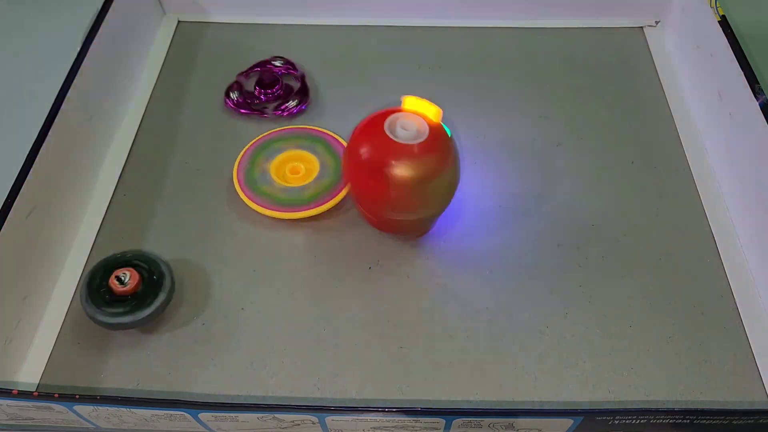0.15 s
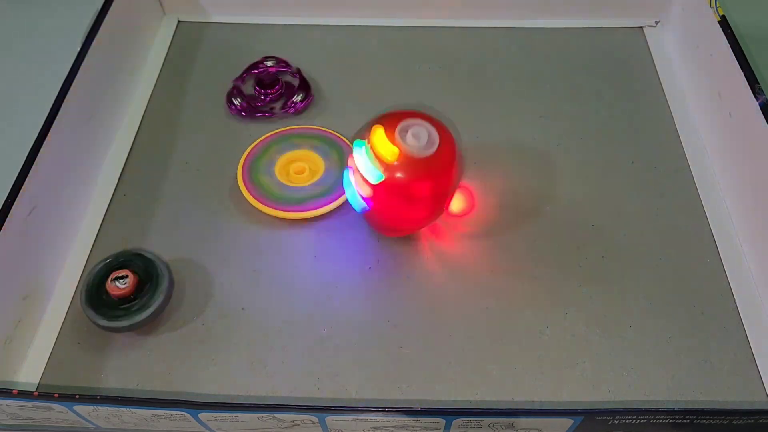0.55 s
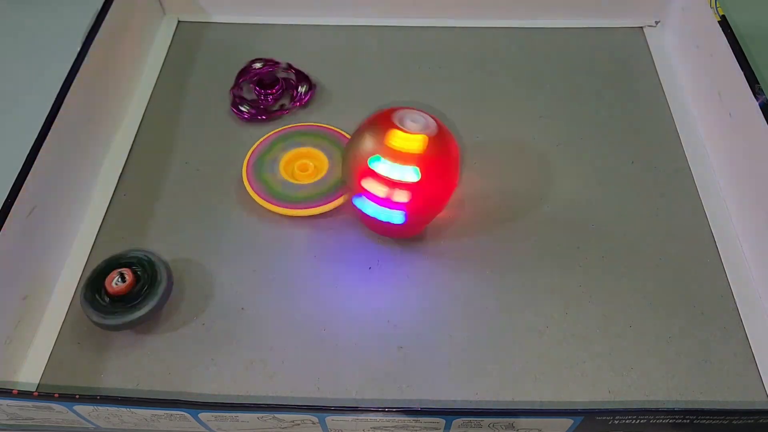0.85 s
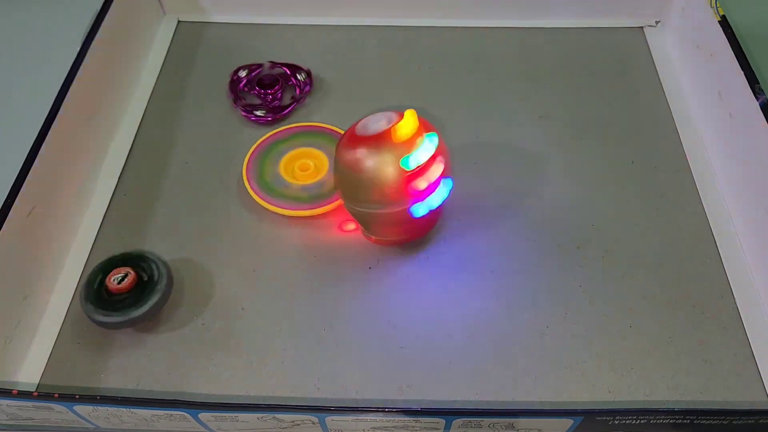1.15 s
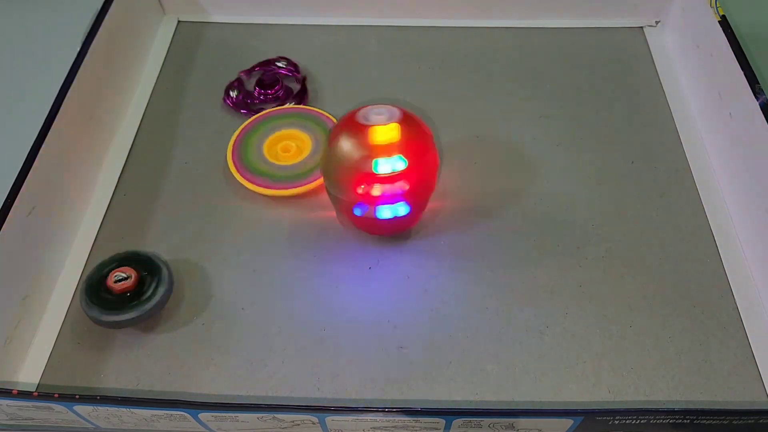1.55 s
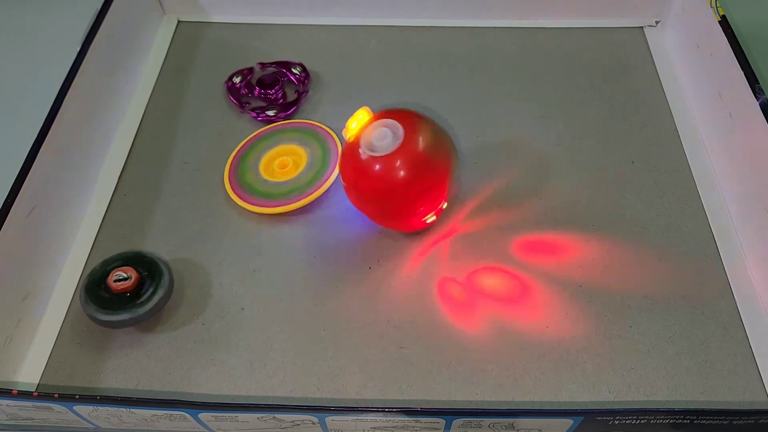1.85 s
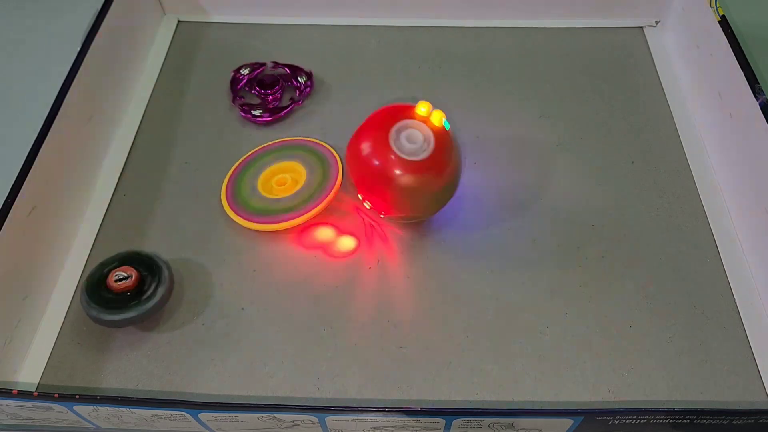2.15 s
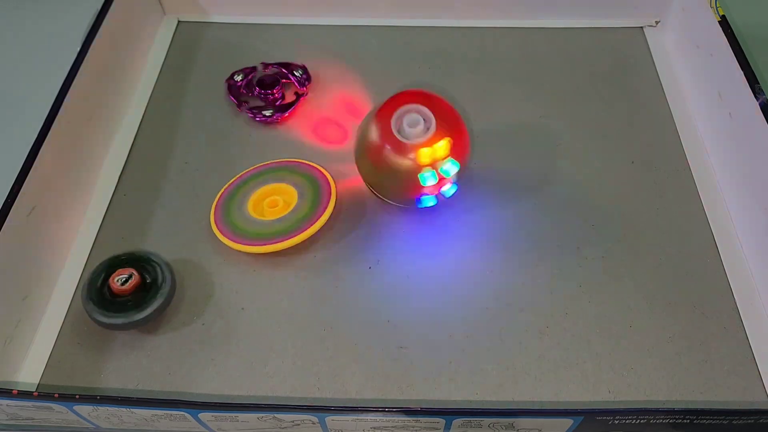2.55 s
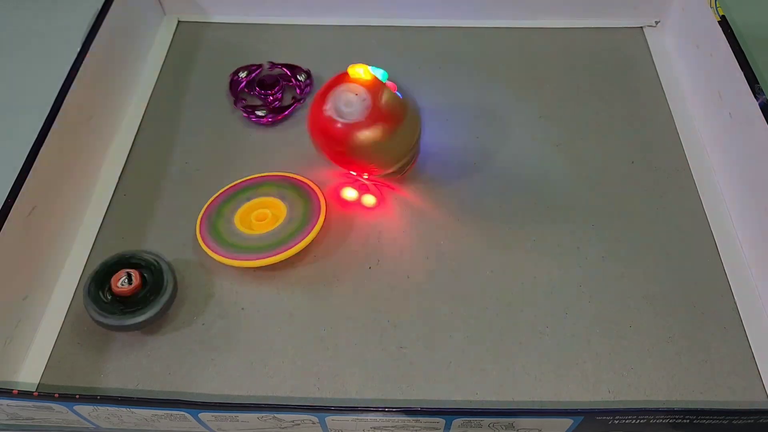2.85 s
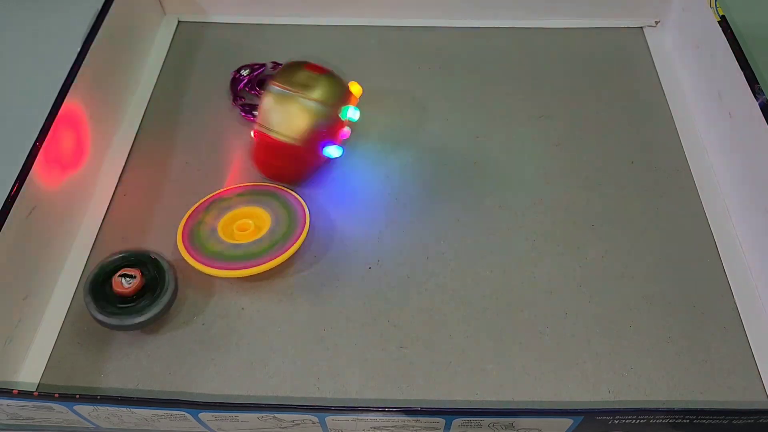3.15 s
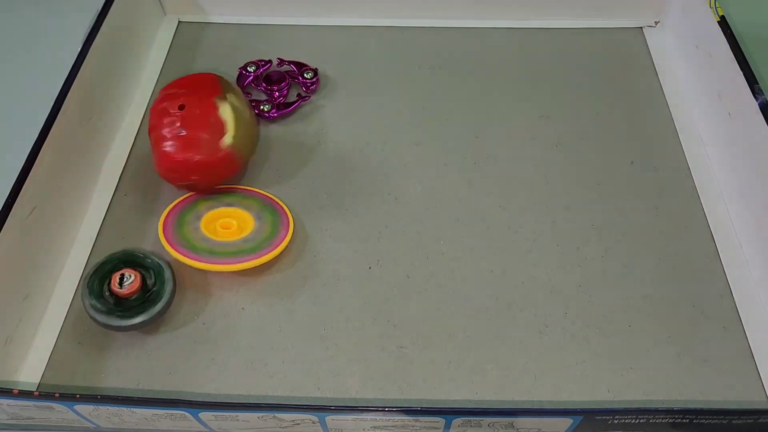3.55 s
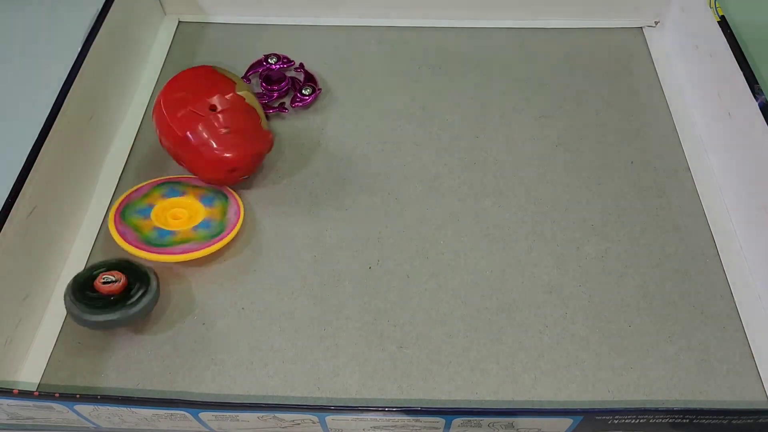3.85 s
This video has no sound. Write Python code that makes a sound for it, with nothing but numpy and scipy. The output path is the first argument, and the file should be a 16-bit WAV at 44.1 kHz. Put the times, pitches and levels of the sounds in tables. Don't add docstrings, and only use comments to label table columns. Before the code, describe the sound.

Spinning plastic tops hum softly and collide sharply before a hollow egg-shaped top falls and rolls clattering

```python
import sys
import numpy as np
from scipy import signal
from scipy.fft import rfft, irfft
from scipy.io import wavfile

SR = 44100
rng = np.random.default_rng(int(sys.argv[2]) if len(sys.argv) > 2 else 0)


def master(y):
    cut = np.clip(np.atleast_2d(y).T, -1, 1)
    pcm = np.round(cut * 32767)
    wavfile.write(sys.argv[1], SR, pcm.astype(np.int16))


def voltage_ratio(level):
    return 10 ** (np.asarray(level, float) / 20)


N = 176400
SECONDS = np.arange(N) / SR
BIN_HZ = np.arange(N // 2 + 1) * SR / N


def rms_one(x):
    return x / np.sqrt(np.mean(x ** 2) + 1e-20)


def drift(rate):
    r = np.exp(-80 * np.pi * rate / SR)
    slow = signal.lfilter([1], [1, -2 * r, r * r], rng.standard_normal(N // 40 + 2002))[2000:]
    return np.interp(np.arange(N) / 40, np.arange(len(slow)), rms_one(slow - slow.mean()))


def at_hz(points, hz):
    table_hz, values = np.array(points).T
    return np.interp(np.log(hz + 1), np.log(table_hz), values)


def equalize(x, gain):
    return irfft(rfft(x) * gain, N)


def colour(x, spectrum):
    return equalize(x, rms_one(voltage_ratio(at_hz(spectrum, BIN_HZ))))


def grains(rate, uneven):
    sizes = voltage_ratio(uneven * np.minimum(rng.exponential(1, N), 4)) * rng.choice([-1, 1], N)
    return rms_one(sizes * (rng.random(N) < rate / SR) + 1e-9)


def resonate(x, peaks):
    out = 0
    for k, (hz, width, db) in enumerate(peaks):
        r = np.exp(-np.pi * width / SR)
        poles = [1, -2 * r * np.cos(2 * np.pi * hz / SR), r * r]
        out = out + (-1) ** k * voltage_ratio(db) * rms_one(signal.lfilter([1, 0, -1], poles, x))
    return out


def stroke(s, rise, hold, t60):
    out, start = np.zeros(N), max(int(s * SR), 0)
    t = np.arange(start, min(N, start + int((rise + hold + 2 * t60) * SR))) / SR - s
    release = voltage_ratio(-60 * np.clip(t - rise - hold, 0, None) / t60)
    out[start:start + len(t)] = np.clip(t / rise, 0, 1) * release
    return out


# (frequency [Hz], density [dB/Hz])
AIR_SPECTRUM = [(15, -19), (25, 6), (72, 3.5), (463, -19), (1610, -17.5), (1940, -8.5), (2220, -16.5),
                (6200, -27.5), (16000, -35)]


def room_air():
    return colour(voltage_ratio(-60) * rng.standard_normal(N), AIR_SPECTRUM)


# (time [s], level [dB])
HUM_LEVEL = [(0, -49.5), (.45, -51), (.58, -68), (.85, -50), (1.3, -55), (2.0, -53.5), (2.15, -63.5),
             (2.42, -46), (2.5, -44), (2.56, -59.5), (2.9, -45), (3.15, -50.5), (3.25, -58.5), (3.5, -53),
             (3.84, -51), (4, -56)]
# (frequency [Hz], width [Hz], level [dB], fading [dB/s])
TRAY_DRONES = [(79, 1.8, -67.5, -1.5), (120.8, 4.5, -61.5, 2), (178.4, 14.5, -64.5, 16.5)]


def hum():
    s, db = np.transpose(HUM_LEVEL)
    level = voltage_ratio(np.interp(SECONDS, s, db) + 1.5 * drift(27))
    pitch_hz = 58.4 + 1.15 * drift(3.9)
    out = level * np.sqrt(2) * np.sin(2 * np.pi * np.cumsum(pitch_hz) / SR)
    for hz, width, db, fading in TRAY_DRONES:
        peak = [(hz, width, db)]
        drone = resonate(resonate(rng.standard_normal(N), peak), peak)
        out += voltage_ratio(db - fading * SECONDS) * rms_one(drone)
    return out


# (time [s], level [dB])
WHIRR_LEVEL = [
    (0, -65.5),
    (1.3, -68.5),
    (2.3, -70.5),
    (4, -75),
]
# (frequency [Hz], width [Hz], level [dB])
TIP_MODES = [(1358, 20, -15), (1888, 94, 2), (2983, 110, -2), (4210, 620, -8), (9100, 850, -12.5),
             (13000, 330, -17)]


def whirr():
    s, db = np.transpose(WHIRR_LEVEL)
    level = voltage_ratio(np.interp(SECONDS, s, db) + 3 * drift(45))
    return level * resonate(grains(1400, uneven=2.1), TIP_MODES)


# (time [s], level [dB])
TRAY_THUMPS = [
    (3.379, -46),
    (3.421, -52),
    (3.584, -41.5),
    (3.661, -48.5),
    (3.719, -49),
]


def thumps():
    boom = resonate(rng.standard_normal(N), [(150, 75, 0)])
    return boom * sum(voltage_ratio(db) * stroke(s, 0.00074, 0.0038, .13) for s, db in TRAY_THUMPS)


# (time [s], rise [s], hold [s], t60 [s], level [dB], plate ring [dB])
RIM_CHATTERS = [
    (1.517, 0.0038, 0.018, 0.11, -54, -8),
    (1.677, 0.0024, 0.042, 0.26, -42, -20),
    (1.738, 0.0035, 0.018, 0.44, -46.5, 6),
    (1.81, 0.007, 0.026, .2, -60.5, -7.5),
    (3.833, 0.0034, 0.13, 0.089, -44.5, -5.5),
]
# (frequency [Hz], width [Hz], level [dB])
RIM_BUZZ = [(1310, 260, -9.5), (2270, 1100, -0.5), (3370, 380, 2), (3960, 660, 0), (4930, 410, -2),
            (6130, 600, -17)]
# (frequency [Hz], width [Hz], level [dB])
PLATE_MODES = [(2982, 54, -0.5), (3190, 86, 3.5), (3310, 50, -4)]
# (time [s], peak [dB])
RIM_TICKS = [(1.731, -24.5), (1.7486, -25.5), (1.7572, -25), (1.7655, -21), (1.7864, -42), (3.826, -27),
             (3.848, -24), (3.8528, -25), (3.858, -20.5), (3.8694, -22)]
# (frequency [Hz], density [dB/Hz])
TICK_COLOUR = [(1500, -13), (3000, -4), (5500, 8), (9000, 3.5), (12000, 1), (15000, -7), (16500, -18)]
CLACK_RISE_S = .0008


def chatter():
    rub = grains(7000, uneven=4.5) * voltage_ratio(2.0 * drift(55))
    buzz, ring = resonate(rub, RIM_BUZZ), resonate(rub, PLATE_MODES)
    out = np.zeros(N)
    for s, rise, hold, t60, db, ring_db in RIM_CHATTERS:
        out += voltage_ratio(db) * stroke(s, rise, hold, t60) * (buzz + voltage_ratio(ring_db) * ring)
    half_rise, tick_t60 = CLACK_RISE_S / 2, .012
    level = sum(voltage_ratio(db - 6) * stroke(s - CLACK_RISE_S, half_rise, half_rise, tick_t60)
                for s, db in RIM_TICKS)
    ticks = level * rng.standard_normal(N)
    tick_ring = voltage_ratio(-19) * np.std(ticks) * resonate(ticks + 1e-18, PLATE_MODES)
    return out + colour(ticks, TICK_COLOUR) + tick_ring


# (frequency [Hz], level [dB], t60 [s])
EGG_MODES = [(536, -28, 0.06), (650, -6, .06), (702, -6, 0.072), (792, -6.5, 0.051), (930, 1, 0.028),
             (1050, -0.5, 0.038), (1210, -5.5, 0.085), (1342, 4.5, 0.046), (1467, -1.5, 0.052),
             (1610, -3.5, 0.022), (1918, 1, 0.029), (2320, -9.5, 0.01), (2430, -5, 0.073),
             (2800, -16, 0.045)]
EGG_HZ = np.array(EGG_MODES)[:, 0]
SHELL_LOW_HZ = 520


def egg(force, shake):
    out = 0
    for (hz, db, t60), gain in zip(EGG_MODES, shake):
        r, w = voltage_ratio(-60 / (t60 * SR)), 2 * np.pi * hz / SR
        poles = [1, -2 * r * np.cos(w), r * r]
        out = out + voltage_ratio(db) * signal.lfilter([0, np.sin(w)], poles, force * gain + 1e-18)
    return signal.sosfilt(signal.butter(4, SHELL_LOW_HZ, "high", fs=SR, output="sos"), out)


# (time [s], length [s], level [dB], share of the
# beating drum [dB])
FLANK_SCUFFS = [(0.41, 0.039, -72.5, 11), (0.738, 0.024, -65, 0), (1.383, 0.11, -58.5, 5.5),
                (1.5, 0.19, -48, -20), (1.656, 0.26, -45, -10), (1.867, 0.066, -53.5, 6),
                (1.955, 0.075, -56.5, -1.5), (2.201, 0.1, -59.5, 4), (2.377, 0.11, -56.5, 0),
                (2.567, 0.076, -58, 5.5), (2.65, 0.16, -55.5, 1), (2.855, 0.28, -59, 9.5),
                (3.02, 0.13, -56.5, -8.5), (3.154, 0.44, -48.5, 2), (3.322, 0.027, -38.5, -13),
                (3.376, 0.066, -36, -17), (3.431, 0.15, -36, -4), (3.595, 0.22, -36, -15),
                (3.692, 0.16, -40, -18), (3.794, 0.21, -42.5, -10), (3.903, 0.17, -43.5, -14)]
# (frequency [Hz], density [dB/Hz])
RUB_COLOUR = [(350, -4), (900, 9), (2500, 7.5), (3000, 11), (8200, 5.5), (9500, 6.5), (12100, 8.5),
              (16000, 1.5)]
# (frequency [Hz], width [Hz], level [dB])
TRAY_MODES = [(129, 15.4, -1.5), (199, 34, -1.5), (272, 17.6, -2), (389, 27, -40.5)]


def rubbing():
    press, drum = np.zeros(N), np.zeros(N)
    for s, length, db, body_db in FLANK_SCUFFS:
        press += voltage_ratio(db) * stroke(s, 0.0017, length / 2, 0.12)
        drum += voltage_ratio(db + body_db) * stroke(s, 0.0017, length / 2, .4)
    hiss = colour(grains(6000, uneven=2.2) * press * voltage_ratio(2.5 * drift(40)), RUB_COLOUR)
    turns_per_s = 55 * voltage_ratio(1.6 * drift(6.37))
    beat = (1 + np.cos(2 * np.pi * np.cumsum(turns_per_s) / SR)) ** 2
    shake = voltage_ratio(-12 * np.abs(np.log2(EGG_HZ / 650)))
    body = voltage_ratio(-34.5) * egg(grains(2500, uneven=2.0) * beat * drum, shake)
    rumble = voltage_ratio(-18) * drum * resonate(rng.standard_normal(N), TRAY_MODES)
    return hiss + rumble + body


# (time [s], peak [dB], favoured pitch [Hz])
EARLY_TAPS = [
    (0.218, -52, 710),
    (0.335, -55, 789),
    (0.417, -46.5, 870),
    (0.746, -46, 1540),
    (0.955, -66, 1490),
    (1.03, -50.5, 1440),
]
# (time [s], peak [dB], favoured pitch [Hz])
EGG_KNOCKS = [(1.393, -42.5, 656), (1.507, -38, 980), (1.663, -24, 2430), (1.883, -46, 685),
              (1.956, -46.5, 910), (2.208, -49, 673), (2.382, -45.5, 696), (2.567, -52, 746),
              (2.673, -33, 680), (2.691, -39.5, 715), (2.891, -40, 670), (2.912, -39.5, 680),
              (2.926, -32.5, 665), (3.158, -28, 576), (3.183, -27.5, 619), (3.191, -35, 660),
              (3.229, -28.5, 650), (3.269, -31, 790), (3.303, -27.5, 970), (3.33, -28, 610),
              (3.379, -28, 1010), (3.392, -30, 2430), (3.419, -19.5, 870), (3.437, -44, 1050),
              (3.458, -27, 2300), (3.486, -31, 1100), (3.64, -25.5, 958), (3.646, -32, 1240),
              (3.657, -36, 1370), (3.662, -35.5, 1090), (3.673, -25, 580), (3.678, -36, 1320),
              (3.688, -34, 1310), (3.696, -50, 1330), (3.71, -33.5, 1080), (3.731, -43, 966),
              (3.761, -53, 960), (3.825, -41, 1370), (3.886, -31, 875), (3.911, -33, 890),
              (3.942, -41, 1970)]


def knocks():
    rows = list(EARLY_TAPS) + list(EGG_KNOCKS)
    force, push, shake = np.zeros(N), np.zeros(N), np.ones((len(EGG_HZ), N))
    judder = rms_one(signal.lfilter(*signal.butter(1, 8400, fs=SR), grains(5000, uneven=1.5)))
    spread_s = 0.015
    for s, db, hz in rows:
        blow = judder * stroke(s, spread_s / 10, spread_s / 10, spread_s)
        blow *= voltage_ratio(db - 15) / np.sqrt(np.sum(blow ** 2))
        force += blow
        push += blow * (SHELL_LOW_HZ / hz) ** 2
        near = np.exp(-(np.log2(EGG_HZ / hz) / 0.22) ** 2)
        octaves_below = np.clip(np.log2(hz / EGG_HZ), 0, None)
        chance_db = 1.5 * rng.standard_normal(len(EGG_HZ))
        shake[:, int(s * SR):] = voltage_ratio(chance_db + 8.5 * near - 5 * octaves_below)[:, None]
    shell = egg(force, shake)
    return shell, voltage_ratio(-23) * np.std(shell) * resonate(push + 1e-18, TRAY_MODES)


# (time [s], peak [dB], dullness [0-1], t60 [s])
PLASTIC_CLACKS = [(0.216, -51, 1, 0.05), (0.418, -45.5, 1, 0.049), (1.032, -45.5, 1, 0.012),
                  (1.507, -14.5, 0, 0.022), (1.5677, -30, 0, 0.05), (1.6643, -8, 0.53, 0.031),
                  (2.8746, -44, 0.1, 0.11), (3.1204, -36.5, 0.4, 0.09), (3.16, -33.5, 0.9, 0.092),
                  (3.185, -30, 0.9, 0.05), (3.2313, -25, 0.87, 0.04), (3.269, -25.5, 0.5, 0.063),
                  (3.3034, -13.5, 0.47, 0.027), (3.3797, -12.5, 0.34, 0.035), (3.4222, -8.5, 0.34, 0.029),
                  (3.5793, -9, 0.34, 0.06), (3.692, -20.5, 0.36, 0.043), (3.8878, -18.5, 0.6, 0.046),
                  (3.913, -28.5, 0.3, 0.07), (3.9416, -19.5, 0.77, 0.023), (3.96, -29, 0.7, 0.031)]
# (frequency [Hz], density [dB/Hz])
BRIGHT_COLOUR = [(300, -48), (1750, -38), (2520, -11), (7820, -4), (10200, 1), (12700, 3), (16000, -7)]
# (frequency [Hz], density [dB/Hz])
DULL_COLOUR = [(300, -55), (600, -43), (900, 4.5), (1700, 6.5), (2450, 10), (3800, 7.5), (14200, -2.5),
               (16000, 6.5)]


def clacks():
    bright = colour(grains(9000, uneven=2.5), BRIGHT_COLOUR)
    dull = colour(grains(9000, uneven=2.5), DULL_COLOUR)
    out = np.zeros(N)
    for s, db, dullness, t60 in PLASTIC_CLACKS:
        blend = (1 - dullness) * bright + dullness * dull
        out += voltage_ratio(db - 6) * stroke(s, CLACK_RISE_S, t60 / 20, t60) * blend
    return out


# (frequency [Hz], correlation [-1..1])
SIDE_LIKENESS = [(60, .998), (250, .94), (600, .85), (1500, .0), (12000, -.15)]


def spread(x):
    alike = np.clip(at_hz(SIDE_LIKENESS, BIN_HZ), -1, 1)
    steps = rng.uniform(-1, 1, 130)
    steps[0] = 0
    turns = np.pi * np.interp(BIN_HZ, np.linspace(700, SR / 2, 130), np.cumsum(steps))
    apart = 1j * np.sqrt(1 - alike)
    mid = equalize(x, np.sqrt((1 + alike) / 2))
    one = equalize(x, apart * np.cos(turns))
    two = equalize(x, apart * np.sin(turns))
    place = 2.5 * drift(6)
    side = one * np.cos(place) + two * np.sin(place)
    return np.array([mid + side, mid - side])


def room(x):
    gap_s, low_t60, high_t60 = .014, .33, .42
    t = np.arange(SR // 2) / SR
    noise = rng.standard_normal((2, len(t)))
    shared = signal.butter(2, 600, fs=SR)
    noise = noise + signal.lfilter(*shared, noise[::-1] - noise) / 2
    low = signal.lfilter(*signal.butter(1, 2500, fs=SR), noise)
    fade = low * voltage_ratio(-60 * t / low_t60) + (noise - low) * voltage_ratio(-60 * t / high_t60)
    tail = fade * np.clip((t - gap_s) / 0.0017, 0, 1)
    tail = tail / np.sqrt(np.sum(tail ** 2) / 2)
    return voltage_ratio(-8) * signal.fftconvolve(x[None], tail, axes=1)[:, :N]


# (frequency [Hz], level [dB])
SIDE_LEAN = [(60, -1), (250, 3), (2000, 1.5), (4000, 1.7), (8000, -0.5), (12000, 0)]


def scene():
    shell, tray = knocks()
    struck = clacks() + shell + rubbing() + chatter()
    direct = struck + tray + thumps() + hum() + whirr() + room_air()
    left, right = spread(direct) + room(struck)
    lean = voltage_ratio(at_hz(SIDE_LEAN, BIN_HZ) / 2)
    return np.array([equalize(left, lean), equalize(right, 1 / lean)])


def top_cut(x):
    return signal.sosfilt(signal.butter(12, 16800, fs=SR, output="sos"), x)


def record(dry):
    dry = signal.sosfilt(signal.butter(2, 40, "high", fs=SR, output="sos"), dry)
    mix = signal.sosfilt(signal.cheby2(10, 45, 16800, fs=SR, output="sos"), dry)
    return top_cut(mix)


dry = scene()
out = record(dry)
master(out)
```